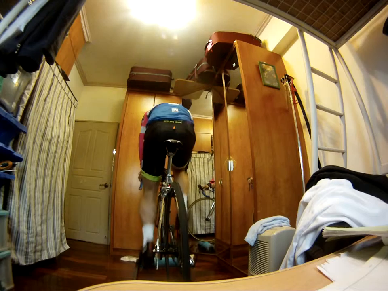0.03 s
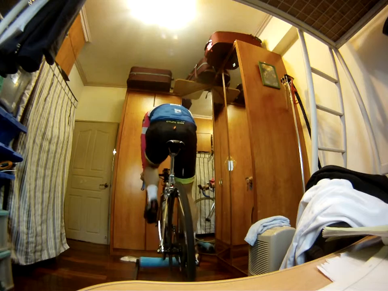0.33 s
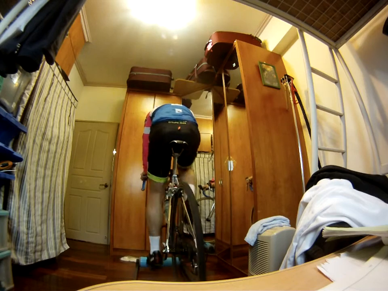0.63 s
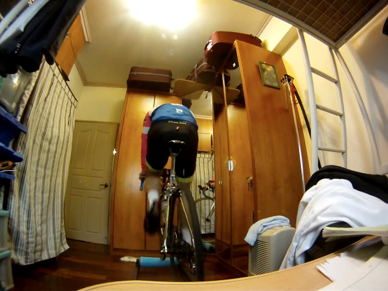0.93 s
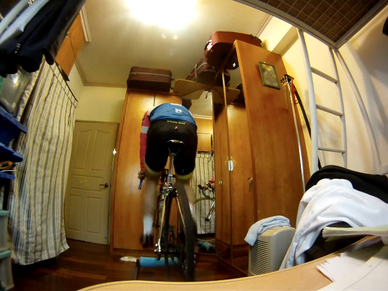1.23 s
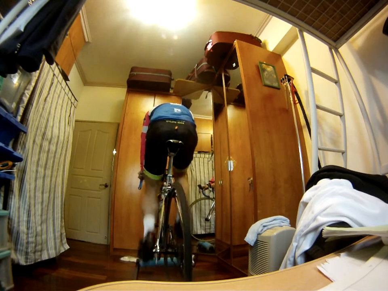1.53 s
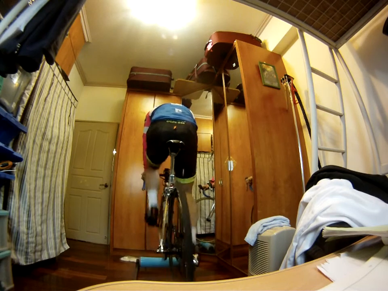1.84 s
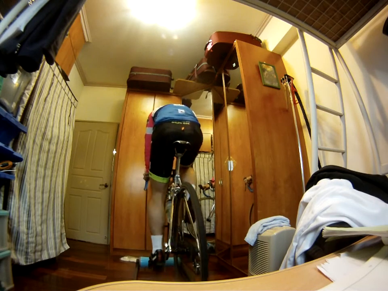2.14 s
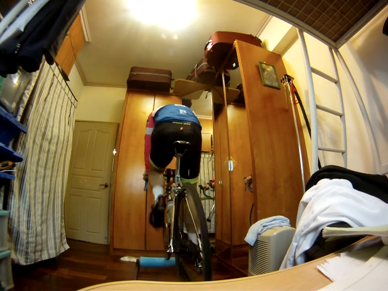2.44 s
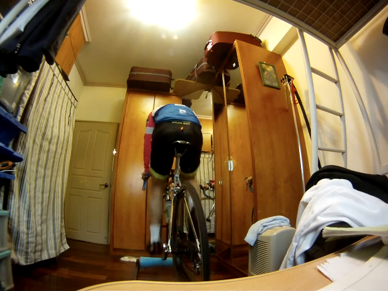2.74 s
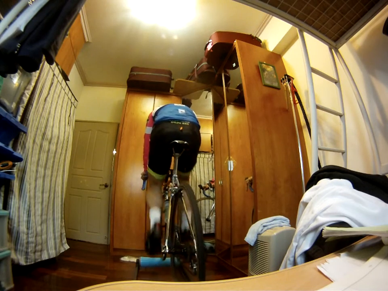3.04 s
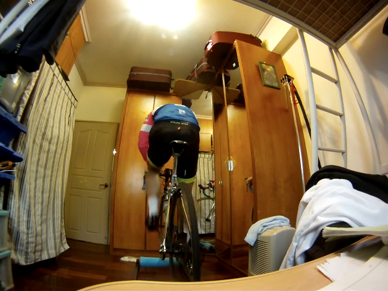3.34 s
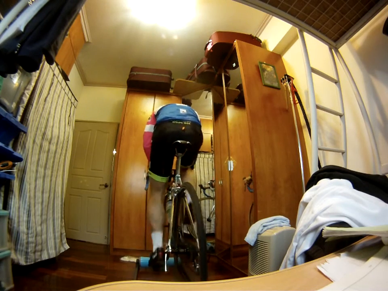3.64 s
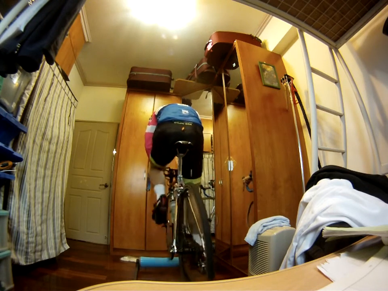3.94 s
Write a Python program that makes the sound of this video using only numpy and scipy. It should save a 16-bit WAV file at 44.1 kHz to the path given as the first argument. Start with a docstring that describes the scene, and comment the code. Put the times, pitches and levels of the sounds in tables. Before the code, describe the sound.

Bicycle tyres whir on training rollers, a high whine pulsing with each pedal stroke.

```python
"""Bicycle on a roller trainer

Steady pedalling in a small, cluttered room. The tyre tread whines on the roller, its pitch surging
with each stroke. The rollers roar and hiss, the floor booms, the chain rattles now and then.
A small camera samples the sound coarsely, mirroring the whine into the high treble."""
import sys
import numpy as np
from scipy import signal
from scipy.fft import rfft, irfft
from scipy.io import wavfile

SR = 44100
rng = np.random.default_rng(int(sys.argv[2]) if len(sys.argv) > 2 else 0)


def output_pcm(signal):
    """Save a mono or channel-first signal as 16-bit PCM at the path in sys.argv[1].

    Samples are clipped to [-1, 1] before scaling.
    """
    pcm = np.clip(np.atleast_2d(signal).T, -1, 1) * 32767
    wavfile.write(sys.argv[1], SR, np.round(pcm).astype(np.int16))


N = 176400

# tread pitch before the pedal surge: t/s, f/Hz
TREAD_PITCH = [(0, 3980), (.25, 3957), (.56, 3863), (1.0, 3891), (1.7, 3907), (2.15, 3865), (2.42, 3873),
               (2.8, 3881), (3.3, 3895), (4.0, 3950)]
# floor and room resonances: f/Hz, width/Hz, level/dB
FLOOR_MODES = [(47, 6.7, -11), (55.8, 8.5, 1), (67.8, 7.6, 0), (100.7, 9, -5), (117, 20, -8.5),
               (125.2, 9.4, -3), (170, 19.6, -14.5)]
# floor boom envelope: t/s, relative level/dB
BOOM_ENVELOPE = [(0.08, -44.5), (0.22, -39.5), (0.25, -50), (0.29, -40), (0.66, -43), (1.8, -42),
                 (1.85, -35), (1.92, -42), (2.6, -41), (2.65, -49.5), (2.82, -40), (3.07, -39), (3.1, -44),
                 (3.37, -41), (3.4, -46), (4.0, -40.5)]
# roller and frame resonances: f/Hz, width/Hz, level/dB
ROLLER_MODES = [(358, 53, -2.5), (385.4, 46, 0), (430, 36, -1), (499.4, 107, -5.5), (621, 98, -18.5),
                (824, 57, -15), (918, 95, -15.5)]
# roller roar envelope: t/s, relative level/dB
ROAR_ENVELOPE = [(0.08, -45), (0.1, -41.5), (0.72, -45), (1.7, -41.5), (1.72, -38), (1.77, -43),
                 (2.51, -45), (2.55, -38.5), (2.69, -47), (2.83, -40.5), (2.95, -43), (3.87, -45),
                 (3.97, -39.5), (4.0, -49)]
# rolling hiss spectrum: f/Hz, relative level/dB
HISS_SPECTRUM = [(20, -11), (40, -6), (150, -2), (280, 0), (600, -4), (780, -11.5), (1100, -13.5),
                 (1800, -13.5), (2450, -8.5), (3300, -13.5), (4300, -6.5), (4900, -16), (5900, -22.5)]
# chain rattles: t/s, relative level/dB
CHAIN_RATTLES = [(0.069, -3), (.19, 2), (0.268, 1.5), (0.301, 1), (.357, -3), (0.467, -5.5), (.567, 1),
                 (.712, -10), (.864, -3), (1.135, -8), (1.17, -14), (1.27, -7), (1.412, -7), (1.433, -6.5),
                 (1.511, -12), (1.674, 1.5), (1.71, -1.5), (1.771, 0.5), (1.952, -8.5), (2.509, -4),
                 (2.638, -4), (2.789, -1.5), (2.838, 1), (2.915, -8), (3.001, -3.5), (3.66, 1.5),
                 (3.741, -16), (3.77, -12), (3.87, -3.5), (3.918, -0.5), (3.954, -9.5)]
# chain and sprocket resonances: f/Hz, width/Hz, level/dB
SPROCKET_MODES = [(420, 173, 9.5), (814, 300, -1.5), (1407, 115, 3.5), (1670, 2700, -8.5), (2183, 185, 0),
                  (2446, 240, 4), (2820, 280, -2), (3270, 670, -6), (4460, 1050, -7)]

STROKE_S, ROOM_T60_S = .372, .28


def undb(db):
    """Decibels to gain."""
    return 10 ** (np.asarray(db) / 20)


def level(x, db):
    """Scale to an rms level."""
    return x * undb(db) / np.sqrt(np.mean(x ** 2))


def curve(t, points):
    """Interpolate a table at times t."""
    return np.interp(t, *np.array(points).T)


def colour(x, points):
    """Filter by a spectrum interpolated over log frequency."""
    hz, db = np.array(points).T
    f = np.maximum(np.arange(N // 2 + 1) * SR / N, 1)
    gain = undb(np.interp(np.log(f), np.log(hz), db))
    return irfft(rfft(x) * gain, N)


def ring(x, modes):
    """Filter by steep resonances whose powers add."""
    f = np.maximum(np.arange(N // 2 + 1) * SR / N, 1)
    power = 0
    for hz, width_hz, db in modes:
        detuning = (f / hz - hz / f) * hz / width_hz
        power += (undb(db) / (1 + detuning ** 2)) ** 2
    return irfft(rfft(x) * np.sqrt(power), N)


def wander(laps, count):
    """Random unevenness round a loop of count spots."""
    spots = rng.standard_normal(count)
    spots = (spots - spots.mean()) / spots.std()
    return np.interp(laps % 1 * count, np.arange(count + 1), np.append(spots, spots[0]))


def room(x, t60_s):
    """Short, dense echo of the furnished room."""
    t = np.arange(SR // 2) / SR
    echo = rng.standard_normal(len(t)) * np.exp(-np.log(1000) * t / t60_s) * (t > .002)
    return signal.fftconvolve(x, echo / np.sqrt(np.sum(echo ** 2)))[:N]


def push(t, peak_s=.2):
    """Pedal effort, -1 to 1, one cycle per stroke."""
    return np.cos(2 * np.pi * (t - peak_s) / STROKE_S)


def tread_whine(t, tread_hz, turns, uneven_hz=49, slip_hz=40.8, rise_db_per_s=.48, push_db=.13):
    """Unevenly spaced ribs strike the roller; echoes shift as the bicycle sways, so the tone flutters."""
    scatter_hz = uneven_hz * wander(2 * turns, count=36)
    scatter_hz += slip_hz * wander(t / t[-1], count=1800)
    tone = np.sin(2 * np.pi * np.cumsum(tread_hz + scatter_hz) / SR)
    sway_rad = np.pi * t / STROKE_S
    echoes = sum(room(tone, t60_s=.2) * lean for lean in (np.cos(sway_rad), np.sin(sway_rad)))
    whine = tone + undb(7) * echoes
    return level(whine * undb(rise_db_per_s * t + push_db * push(t)), db=-40)


def floor_boom(t, push_db=.1, lag_s=.036):
    """The rollers shake the floor, slightly harder under each stroke."""
    shake = rng.standard_normal(N) * undb(push_db * push(t - lag_s))
    boom = ring(shake, FLOOR_MODES) * undb(curve(t, BOOM_ENVELOPE))
    return level(boom, db=-42)


def rolling(t, turns, bump_at_s=.021, roar_bump_db=.5, hiss_bump_db=1):
    """Tyres roar through the frame and hiss on the rollers, pressing harder twice a turn."""
    bump = np.cos(2 * np.pi * 2 * (turns - np.interp(bump_at_s, t, turns)))
    roar = ring(rng.standard_normal(N), ROLLER_MODES)
    roar *= undb(roar_bump_db * bump + curve(t, ROAR_ENVELOPE))
    hiss = colour(rng.standard_normal(N), HISS_SPECTRUM) * undb(hiss_bump_db * bump)
    hiss += undb(-8) * room(hiss, ROOM_T60_S)
    return level(roar, db=-43.5) + level(hiss, db=-45.5)


def chain(t, idle_db=-18, attack_s=.0046, hold_s=.011, fall_s=.013, clicks_per_s=1200):
    """Links tick lightly over the sprockets and clatter in short bursts."""
    force = np.full(N, undb(idle_db))
    for start_s, db in CHAIN_RATTLES:
        age_s = t - start_s
        rise = np.clip(age_s / attack_s, 0, 1)
        fall = np.exp(-np.maximum(age_s - attack_s - hold_s, 0) / fall_s)
        force += undb(db) * rise * fall
    clicks = (rng.random(N) < clicks_per_s / SR) * np.sign(rng.standard_normal(N))
    contact = level(clicks, db=0) + level(rng.standard_normal(N), db=-3)
    clatter = ring(contact * force, SPROCKET_MODES)
    return level(clatter + room(clatter, ROOM_T60_S), db=-49.5)


def scene():
    """Mono mix; pedalling sets the wheel speed, which drives the whine and the tyre throb."""
    surge_hz, ribs_per_turn = 58.9, 1112
    t = np.arange(N) / SR
    tread_hz = curve(t, TREAD_PITCH) + surge_hz * push(t)
    turns = np.cumsum(tread_hz) / SR / ribs_per_turn
    mix = tread_whine(t, tread_hz, turns) + floor_boom(t) + rolling(t, turns) + chain(t)
    return mix[None]


def record(dry):
    """The camera starts late and adds faint hiss; its sample-and-hold mirrors the spectrum upwards."""
    start_s, hold_hz, cutoff_hz, hiss_db = .069, 12000, 15300, -70
    coarse = signal.resample_poly(dry, hold_hz, SR, axis=1)
    running = np.arange(coarse.shape[1]) > start_s * hold_hz
    coarse = (coarse + undb(hiss_db) * rng.standard_normal(coarse.shape)) * running
    steps = np.repeat(coarse, 4, axis=1)
    held = signal.resample_poly(steps, SR, 4 * hold_hz, axis=1)[:, :N]
    lowpass = signal.ellip(12, .1, 80, cutoff_hz, fs=SR, output="sos")
    return signal.sosfilt(lowpass, held)


dry = scene()
out = record(dry)
output_pcm(out)
```